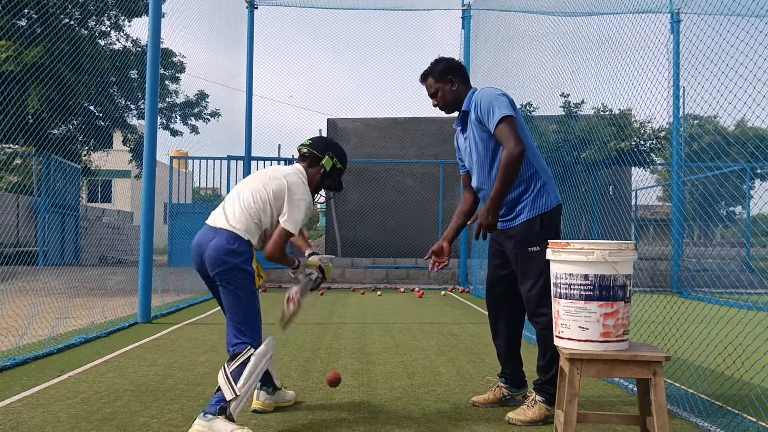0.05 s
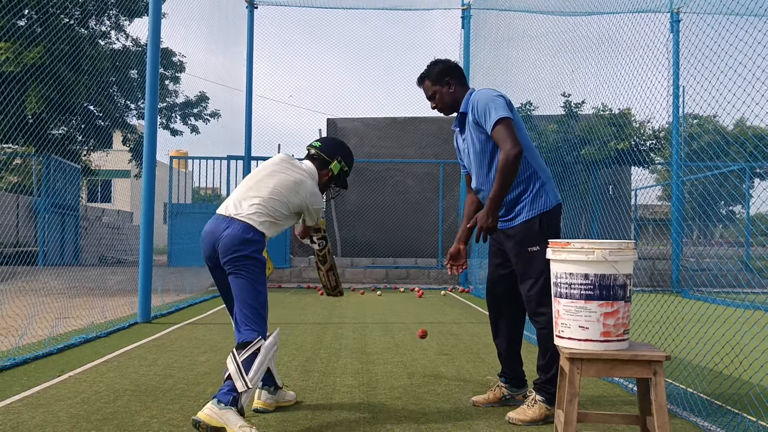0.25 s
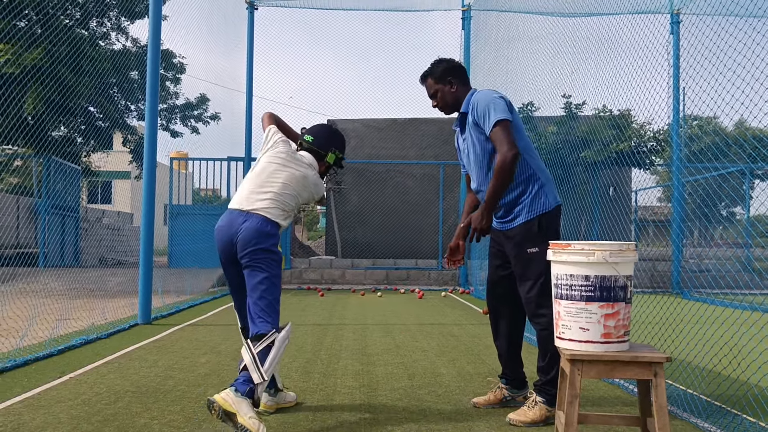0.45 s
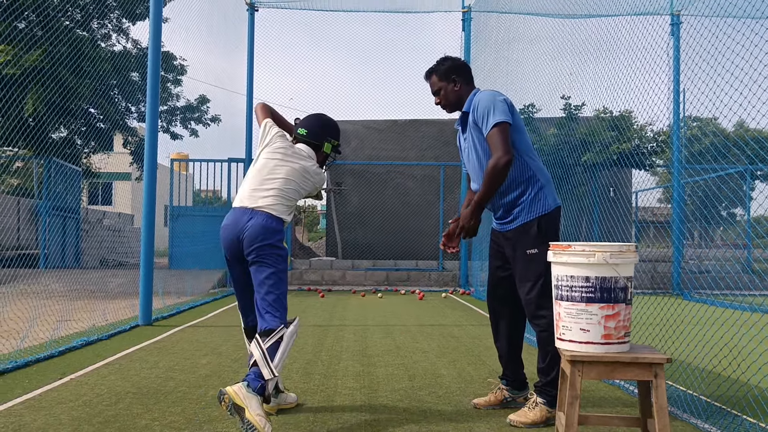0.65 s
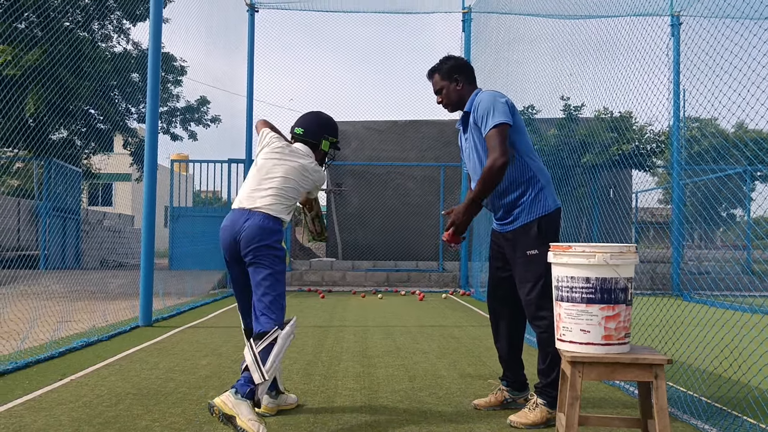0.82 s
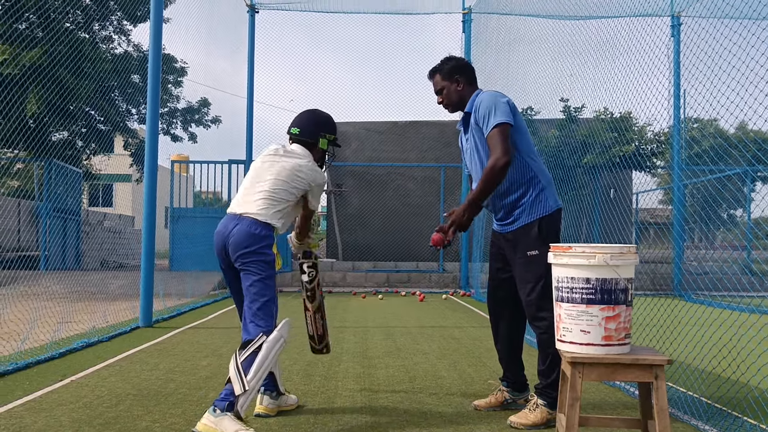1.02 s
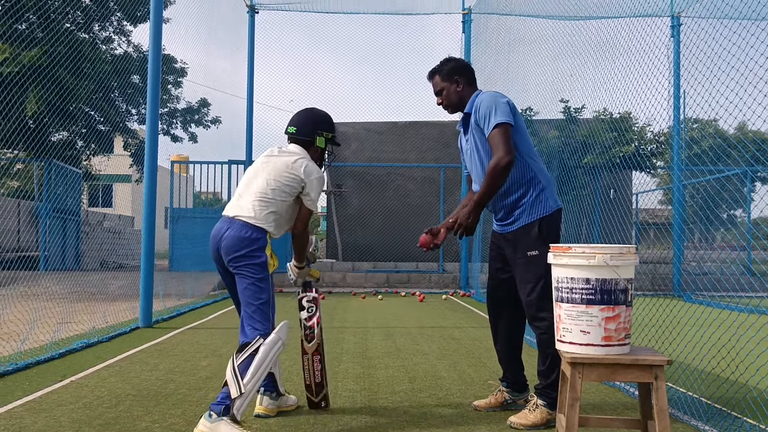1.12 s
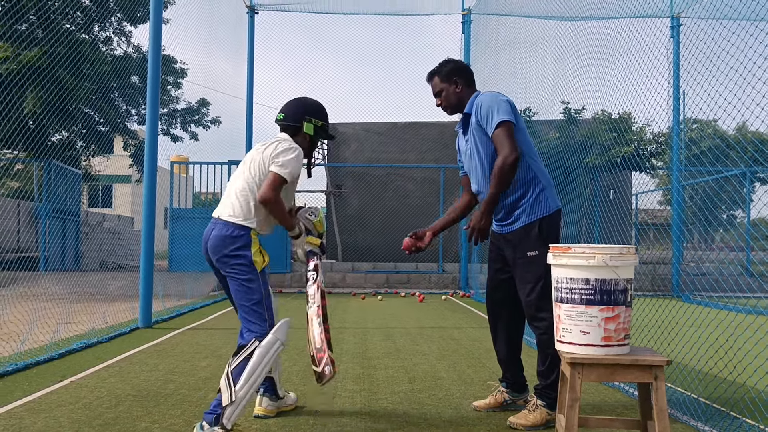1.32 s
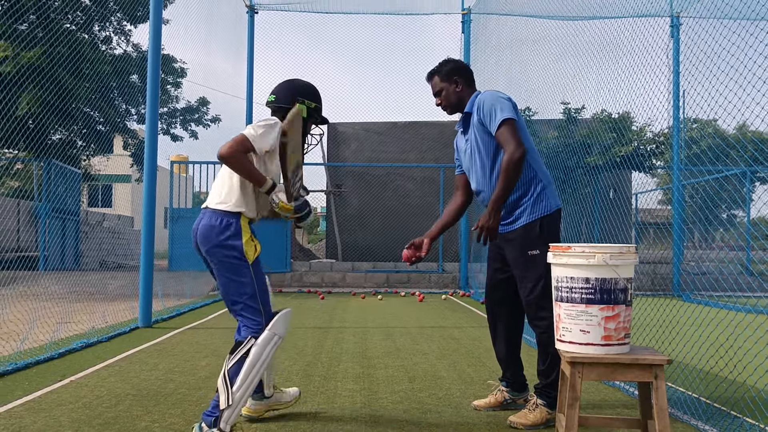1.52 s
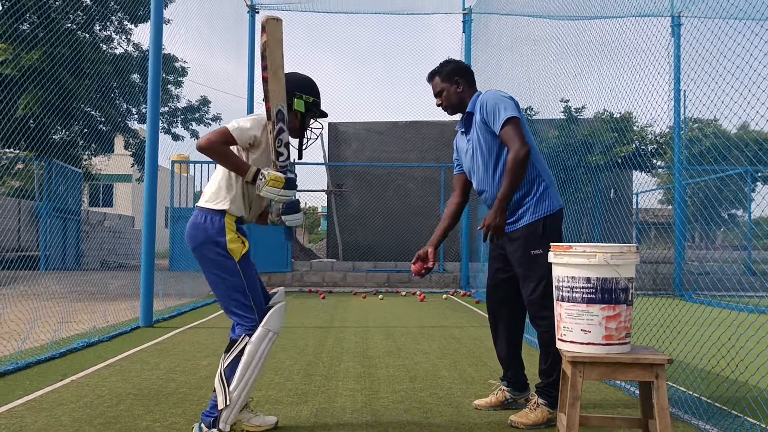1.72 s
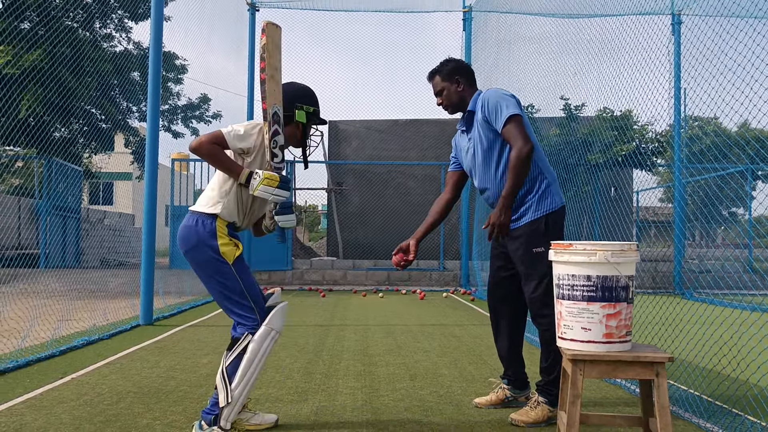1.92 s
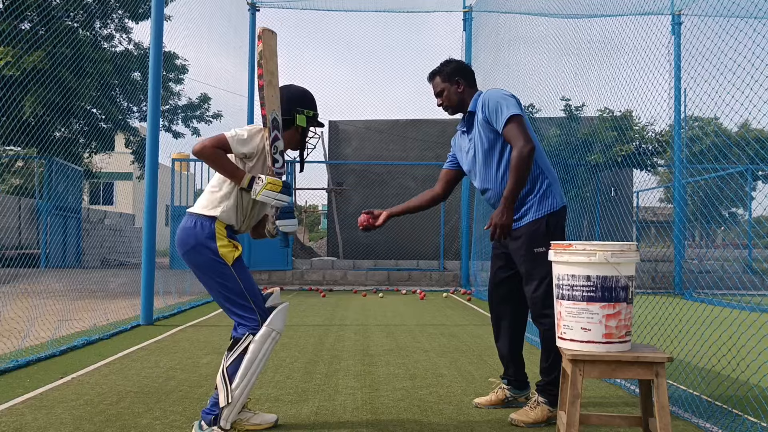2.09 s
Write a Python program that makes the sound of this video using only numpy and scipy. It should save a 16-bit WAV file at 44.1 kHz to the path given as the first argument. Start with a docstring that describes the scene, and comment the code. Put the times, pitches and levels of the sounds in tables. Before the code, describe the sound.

One sharp, dry willow crack, doubled by a knock into matting, slaps back off nearby walls outdoors; later come soft shoe scuffs, a gritty bat tap, faint bird whistles, a thin far horn and one caw, in stereo.

```python
"""Over quiet air and a low hum, a dropped ball ticks and a willow bat cracks it into matting: batting practice.
Blows are damped modes plus a splintery burst of noise grains; wall slaps and noise washes answer them.
Shoes scuff and the toe of the bat is grounded, as sprays of coloured grains.
Far off: gliding bird whistles, one crow's caw of fluttering harmonics and a thin horn of three high partials,
all with scattered echoes."""
import sys
import numpy as np
from scipy import signal
from scipy.fft import rfft, irfft
from scipy.io import wavfile
from scipy.ndimage import uniform_filter1d

SR = 44100
rng = np.random.default_rng(int(sys.argv[2]) if len(sys.argv) > 2 else 0)


def store_wav(level_fs):
    """Save 16-bit WAV to argv[1]."""
    pcm = np.round(np.clip(np.atleast_2d(level_fs), -1, 1) * 32767)
    wavfile.write(sys.argv[1], SR, pcm.T.astype(np.int16))


N = 94815
TIME_S = np.arange(N) / SR
FREQ_HZ = np.fft.rfftfreq(N, 1 / SR) + 1   # 1 Hz up, so that logs and ratios stay finite

# Blows on bat and matting: (time [s], level [dB], left minus right [dB], lead of the left side [ms])
BAT_HIT = (.2132, -6, .3, 0)
PITCH_HIT = (.2472, -6.3, 0, .2)
# Modes of bat, matting and ball: (frequency [Hz], level [dB], t60 [s])
BAT_MODES = [(350, -4.3, .0074), (820, -3.2, .007), (1000, -20, .014), (2332, -20, .0106),
             (3100, -18.5, .0055), (3984, -14.5, .0018), (12594, -37, .0023)]
PITCH_MODES = [(380, -10.5, .0061), (773, -5.3, .0115), (1000, -17, .022), (1490, -10.4, .0047),
               (3281, -22, .008), (4383, -25.5, .002), (7251, -42, .0069)]
BALL_MODES = [(980, -5, .025), (4520, -13, .02)]
BLOW_LOW_CUT_HZ = 130

# Dropped ball: (time [s], level [dB], attack [s], t60 [s], left-right likeness [-1 to 1])
BALL_DROP = (.160, -42.5, .003, .05, .7)
# Its colour: (frequency [Hz], spectral level [dB])
BALL_DROP_COLOUR = [(1300, -14), (2400, -1), (3800, -12), (4500, -5), (5400, -13), (6000, -36),
                    (15000, -47)]
# Splintery ends of the two blows: (time [s], level [dB], attack [s], t60 [s], left-right likeness [-1 to 1])
CRACKS = [(.2135, -28, .001, .04, .8), (.2476, -29, .001, .05, .3)]
# Their colour: (frequency [Hz], spectral level [dB])
CRACK_COLOUR = [(170, -8), (800, 0), (3200, -8), (5500, -18), (8500, -40), (13000, -34), (16000, -44)]

# Slaps back from the walls and the end screen: (time [s], level [dB])
SLAPS = [(.2565, -27), (.2635, -27), (.2685, -29), (.2805, -20), (.2895, -20), (.3035, -29), (.3255, -35),
         (.3415, -36), (.3625, -40), (.3755, -30), (.398, -33), (.4105, -29), (.430, -40), (.507, -47)]
# Modes of a slap before random variation: (frequency [Hz], level [dB], t60 [s])
SLAP_MODES = [(430, -8, .008), (800, -4, .008), (1400, -23, .008)]
SLAP_PAN_SPREAD_DB, SLAP_LEAD_SPREAD_MS, SLAP_LOW_CUT_HZ = 2.5, .15, 260
# Yard washes: (time [s], level [dB], attack [s], t60 [s], left-right likeness [-1 to 1])
YARD_NEAR = (.229, -33, .03, .28, .65)
YARD_FAR = (.312, -43, .08, .28, .55)
YARD_RING = (.39, -53, .06, .3, .4)
# Their colours: (frequency [Hz], spectral level [dB])
YARD_NEAR_COLOUR = [(100, -26), (190, -7), (300, -3), (649, -6), (824, 1), (1150, -17), (1480, -21),
                    (4450, -29), (8000, -47), (10400, -77)]
YARD_FAR_COLOUR = [(190, -38), (280, -22), (380, -4), (560, 0), (950, -2), (1250, -20), (4000, -54)]
YARD_RING_COLOUR = [(740, -9), (890, 0), (1160, -24), (1400, -6), (1650, -26)]

# Shoes and bat toe: (time [s], level [dB], attack [s], t60 [s], left-right likeness [-1 to 1])
STRIDE = (.264, -48, .026, .15, .2)
SHOE_DRAG = (.622, -68.5, .012, .45, .2)
SHUFFLES = [(.87, -70, .11, .25, .1), (1.26, -66, .06, .35, .1), (1.85, -62, .06, .6, .1)]
BAT_GROUNDED = (1.2075, -37.5, .007, .11, .6)
# Their colours: (frequency [Hz], spectral level [dB])
STRIDE_COLOUR = [(2000, -6), (3200, -2), (5500, -6), (8500, -29), (12700, -13), (16000, -28)]
SHOE_DRAG_COLOUR = [(4000, -18), (5000, -8), (5600, -4), (6200, -9), (7000, 0), (8000, -34), (10500, -28),
                    (13000, -18), (16000, -32)]
SHUFFLE_COLOUR = [(2000, -3), (3200, 0), (5700, -7), (8500, -33), (15000, -30)]
BAT_GROUNDED_COLOUR = [(110, -13), (600, -29), (1350, -24), (1580, -8), (1800, -25), (2450, -9),
                       (2950, -11), (3500, 1), (4200, -13), (5100, -11), (7400, -21), (8600, -35),
                       (11900, -22), (15500, -27)]
SHOE_DRAG_HOLD_S = .1
GRAINS_PER_S, GRAIN_SPREAD_DB = 5000, 3.0

# Stereo tilt of the near sounds and the air: (frequency [Hz], left minus right [dB])
LEFT_BIAS = [(500, .3), (2000, 0), (5000, 2), (9000, 4), (13000, 15)]

# Caw: (time [s], pitch [Hz], level [dB], roughness [0 to 1], throat resonance [Hz])
CAW = [(1.708, 455, -74, .2, 1380), (1.752, 428, -52, .45, 1420), (1.79, 420, -50.5, .8, 1500),
       (1.83, 413, -52.5, .6, 1500), (1.86, 406, -49, .15, 1600), (1.925, 399, -47, .15, 1610),
       (1.975, 388, -53, .5, 1540), (2.01, 340, -75, .5, 1350)]
# Throat response: (frequency [ratio to the throat resonance], level [dB])
THROAT = [(.62, -48), (.75, -20), (.86, -4), (1, 0), (1.2, -5), (1.32, -29), (1.55, -23), (1.8, -22),
          (2.8, -47)]
FLUTTER_HZ, FLUTTER_DEPTH = 97, .9
CAW_JITTER, RASP_HZ, RASP_SHARE = .009, 130, .8

# Bird whistles: (time [s], length [s], start pitch [Hz], end pitch [Hz], level [dB])
WHISTLES = [(.068, .035, 6800, 5600, -75), (.68, .13, 5700, 5300, -72), (.80, .055, 700, 650, -59.5),
            (.87, .09, 685, 680, -70), (1.155, .085, 790, 745, -54.5), (1.24, .11, 770, 830, -66),
            (.785, .065, 4480, 4400, -70), (.955, .045, 3400, 3200, -63), (.88, .07, 3200, 3500, -68),
            (1.31, .05, 2720, 2620, -69), (.97, .09, 1090, 1290, -74)]
WHISTLE_WAVER, WHISTLE_OCTAVE_DB = .018, -20

# Horn partials: (frequency [Hz], level when loudest [dB])
HORN_PARTIALS = [(3183, -5), (3540, 0), (3888, -7)]
# Horn loudness: (time [s], level [dB])
HORN_LEVEL = [(0, -71), (.09, -66), (.35, -70), (.41, -90), (1.11, -86), (1.15, -58), (1.33, -64),
              (1.385, -55), (1.46, -67), (1.53, -60), (1.65, -68), (1.78, -58), (1.95, -57), (2.15, -77)]
HORN_WAVER, HORN_FLICKER_DB, HORN_PURITY_DB = .007, 4.0, 16
DISTANT_T60_S, DISTANT_WET_DB, DISTANT_PAN_DB = .25, -2.5, 2.0

HUM_HZ, HUM_WAVER, HUM_DB, HUM_DRIFT_DB = 91.5, .03, -72.5, 2.5
# Colour of the outdoor air: (frequency [Hz], spectral level [dB])
AIR_COLOUR = [(25, -16), (55, -9), (95, -1.5), (250, -5.5), (516, -14), (1000, -22), (1600, -18.5),
              (3300, -19.5), (4300, -27), (6700, -35), (7800, -54), (12500, -49), (16000, -54)]
# Stereo likeness of the air: (frequency [Hz], left-right likeness [-1 to 1])
AIR_LIKENESS = [(60, .93), (200, .88), (500, .6), (1200, .1), (8000, 0)]
AIR_DB = -67
STOPBAND_HZ = 16700


def from_db(db):
    """Decibels to gain."""
    return 10 ** (np.asarray(db) / 20)


def rms_one(x):
    """Scale to unit rms."""
    return x / np.sqrt(np.mean(x ** 2) + 1e-20)


def at_hz(points, hz):
    """Read a table on a log-frequency axis."""
    table_hz, values = np.transpose(points)
    return np.interp(np.log(hz), np.log(table_hz), values)


def pan(db):
    """Left and right gains for a level difference."""
    return from_db(np.array([[.5], [-.5]]) * db)


def drift(hz):
    """Low-passed noise of unit rms: slow random wander."""
    return rms_one(irfft(rfft(rng.standard_normal(N)) / (1 + (FREQ_HZ / hz) ** 2), N))


def phase_of(hz):
    """Integrate a varying frequency to phase in radians."""
    return 2 * np.pi * np.cumsum(hz) / SR


def coloured(pair, colour, likeness):
    """Mix unrelated signals as mid and side to set stereo likeness, then shape the spectrum; rms 1."""
    mid, side = rfft(pair)
    likeness = np.clip(likeness, -1, 1)
    low_edge = 1 + (.8 * colour[0][0] / FREQ_HZ) ** 4
    high_edge = 1 + (.8 * FREQ_HZ / colour[-1][0]) ** 8
    gain = from_db(at_hz(colour, FREQ_HZ)) / low_edge / high_edge
    both = np.sqrt(1 + likeness) * mid + np.sqrt(1 - likeness) * side * np.array([[1], [-1]])
    return rms_one(irfft(both * gain * pan(at_hz(LEFT_BIAS, FREQ_HZ)), N))


def knock(start_s, db, modes):
    """A contact rings damped modes of alternating sign; each swells for a moment and dies."""
    first = int(start_s * SR)
    age_s = np.maximum(TIME_S - start_s, 0)[first:first + SR // 10, None]
    hz, level_db, t60_s = np.transpose(modes)
    decay = age_s * np.log(1000) / t60_s
    swell = decay * np.exp(1 - decay)   # peaks at 1
    gain = (-1) ** np.arange(len(hz)) * from_db(db + level_db)
    ring = (gain * swell * np.sin(2 * np.pi * hz * age_s)).sum(1)
    return np.pad(ring, (first, N))[:N]


def blow(hit, modes, low_cut_hz):
    """A blow at two microphones, high-passed to keep the knock tight and light in bass."""
    start_s, db, pan_db, lead_ms = hit
    left = knock(start_s, db, modes)
    right = knock(start_s + lead_ms / 1000, db, modes)
    high_pass = signal.butter(2, low_cut_hz, "high", fs=SR, output="sos")
    return pan(pan_db) * signal.sosfilt(high_pass, np.array([left, right]) + 1e-18)


def burst(shape, colour, hold_s=0, gritty=False):
    """Noise, or a spray of random-sign grains, that rises, holds and decays exponentially."""
    start_s, db, attack_s, t60_s, likeness = shape
    pair = rng.standard_normal((2, N))
    if gritty:
        grains = rng.random((2, N)) < GRAINS_PER_S / SR
        grain_db = GRAIN_SPREAD_DB * np.minimum(rng.exponential(1, (2, N)), 4)
        pair = np.sign(pair) * grains * from_db(grain_db)
    rise = np.clip((TIME_S - start_s) / attack_s, 0, 1)
    decay_s = np.maximum(TIME_S - start_s - attack_s - hold_s, 0)
    level = rise * from_db(db) * np.exp(-np.log(1000) * decay_s / t60_s)
    return level * coloured(pair, colour, likeness)


def stroke():
    """The ball drops with a ringing tick, meets bat, then matting; both blows end in a grainy crack."""
    tick = burst(BALL_DROP, BALL_DROP_COLOUR, gritty=True)
    tick = tick + knock(BALL_DROP[0], BALL_DROP[1], BALL_MODES)
    blows = blow(BAT_HIT, BAT_MODES, BLOW_LOW_CUT_HZ) + blow(PITCH_HIT, PITCH_MODES, BLOW_LOW_CUT_HZ)
    blows = irfft(rfft(blows) * pan(at_hz(LEFT_BIAS, FREQ_HZ)), N)
    cracks = sum(burst(row, CRACK_COLOUR, gritty=True) for row in CRACKS)
    return tick + blows + cracks


def yard():
    """Dull slaps with randomly varied modes, over near and far echo washes and a hollow ring."""
    out = burst(YARD_NEAR, YARD_NEAR_COLOUR) + burst(YARD_FAR, YARD_FAR_COLOUR)
    out = out + burst(YARD_RING, YARD_RING_COLOUR)
    for start_s, db in SLAPS:
        modes = [(hz * (1 + .06 * rng.normal()), mode_db + rng.normal(), t60_s)
                 for hz, mode_db, t60_s in SLAP_MODES]
        pan_db = SLAP_PAN_SPREAD_DB * rng.normal()
        lead_ms = SLAP_LEAD_SPREAD_MS * rng.normal()
        out = out + blow((start_s, db, pan_db, lead_ms), modes, SLAP_LOW_CUT_HZ)
    return out


def footwork():
    """Grain sprays: shoes scuff the matting and the bat toe comes down on grit."""
    stride = burst(STRIDE, STRIDE_COLOUR, gritty=True)
    drag = burst(SHOE_DRAG, SHOE_DRAG_COLOUR, SHOE_DRAG_HOLD_S, gritty=True)
    shuffles = sum(burst(row, SHUFFLE_COLOUR, gritty=True) for row in SHUFFLES)
    return stride + drag + shuffles + burst(BAT_GROUNDED, BAT_GROUNDED_COLOUR, gritty=True)


def crow():
    """A falling, fluttering caw; hoarseness alternates strong and weak cycles, adding half-way partials."""
    time_s, *columns = np.transpose(CAW)
    hz, db, rough, throat_hz = (np.interp(TIME_S, time_s, column) for column in columns)
    phase = phase_of(hz * (1 + CAW_JITTER * drift(60)))
    flutter = np.cos(phase_of(FLUTTER_HZ * (1 + .07 * drift(20))))
    rough = np.clip(rough, 0, 1)
    flutter_swing = FLUTTER_DEPTH * (1 - rough ** 2) * flutter
    voice = 0
    for k in np.arange(2, 12, .5):
        swing = 1 + flutter_swing + RASP_SHARE * rough * drift(RASP_HZ)
        strength = rough if k % 1 else 1   # half-way partials only where hoarse
        throat = from_db(at_hz(THROAT, k * hz / throat_hz))
        voice = voice + strength * throat * swing * np.cos(k * phase + 2 * np.pi * rng.random())
    levelled = voice / np.sqrt(uniform_filter1d(voice ** 2, size=1400) + 1e-12)
    return levelled * from_db(db) * (TIME_S > time_s[0]) * (TIME_S < time_s[-1])


def birds():
    """Soft, nearly pure whistles that glide a little, each with a faint octave."""
    out, waver = 0, 1 + WHISTLE_WAVER * drift(40)
    for start_s, length_s, start_hz, end_hz, db in WHISTLES:
        progress = np.clip((TIME_S - start_s) / length_s, 0, 1)
        phase = phase_of((start_hz + (end_hz - start_hz) * progress) * waver)
        tone = np.sin(phase) + from_db(WHISTLE_OCTAVE_DB) * np.sin(2 * phase)
        out = out + from_db(db) * np.sin(np.pi * progress) * tone
    return out


def horn():
    """Only a far horn's upper partials arrive, each flickering; when faint it thins towards one tone."""
    waver = 1 + HORN_WAVER * drift(50)
    level_db = np.interp(TIME_S, *np.transpose(HORN_LEVEL))
    thinning = 1 + (level_db.max() - level_db) / HORN_PURITY_DB
    tone = 0
    for hz, db in HORN_PARTIALS:
        partial_db = db * thinning + HORN_FLICKER_DB * drift(15)
        tone = tone + from_db(partial_db) * np.sin(phase_of(hz * waver))
    return rms_one(tone) * from_db(level_db)


def distant(x):
    """Scattered echoes from houses and trees: convolution with decaying noise."""
    echoes = rng.standard_normal((2, N)) * np.exp(-np.log(1000) * TIME_S / DISTANT_T60_S)
    echoes /= np.sqrt((echoes ** 2).sum(1, keepdims=True))
    wet = signal.fftconvolve(x[None], echoes, axes=1)[:, :N]
    return pan(DISTANT_PAN_DB) * (x + from_db(DISTANT_WET_DB) * wet)


def air():
    """The quiet outdoor floor of coloured noise, with a wavering motor hum as one sine."""
    hum = np.sqrt(2) * np.sin(phase_of(HUM_HZ * (1 + HUM_WAVER * drift(10))))
    hum = hum * from_db(HUM_DB + HUM_DRIFT_DB * drift(8))
    floor = coloured(rng.standard_normal((2, N)), AIR_COLOUR, at_hz(AIR_LIKENESS, FREQ_HZ))
    return hum + from_db(AIR_DB) * floor


def scene():
    """The net in front, the neighbourhood behind."""
    return stroke() + yard() + footwork() + distant(crow() + birds() + horn()) + air()


def record(dry):
    """Tanh rounds the peaks; a steep low-pass cuts the top."""
    low_pass = signal.cheby2(12, 70, STOPBAND_HZ, fs=SR, output="sos")
    return signal.sosfilt(low_pass, np.tanh(dry))


dry = scene()
out = record(dry)
store_wav(out)
```